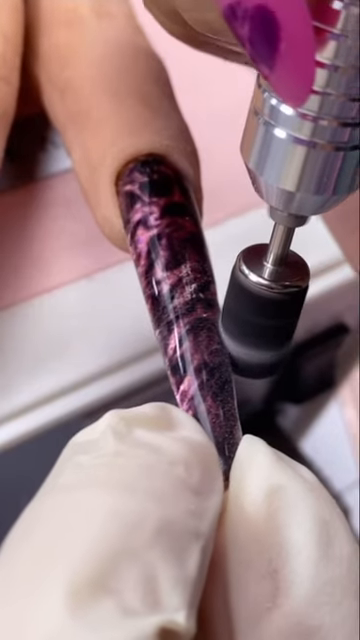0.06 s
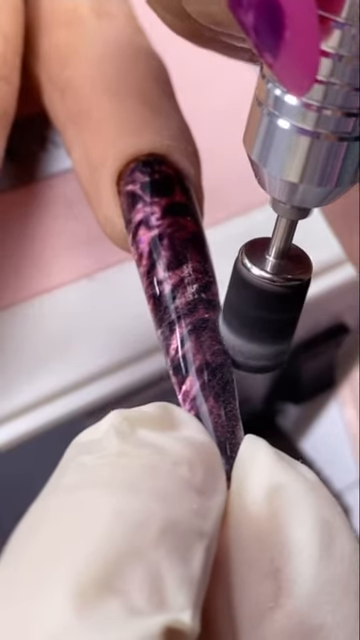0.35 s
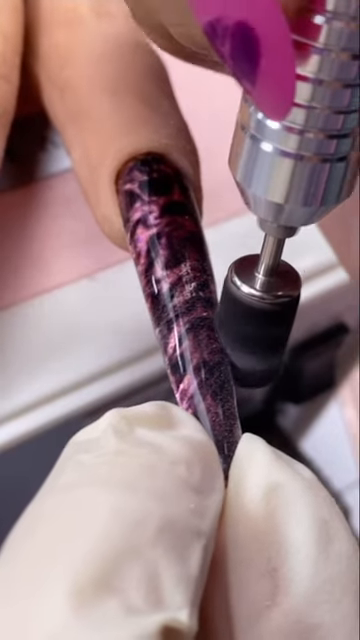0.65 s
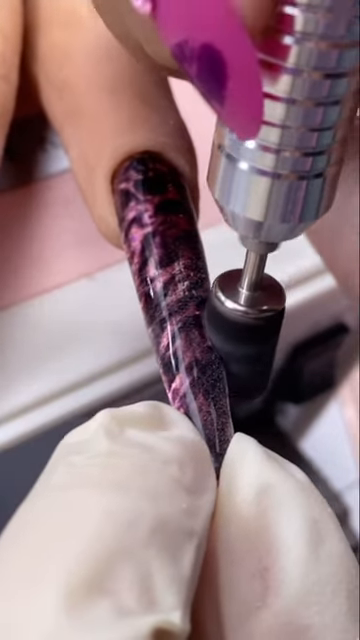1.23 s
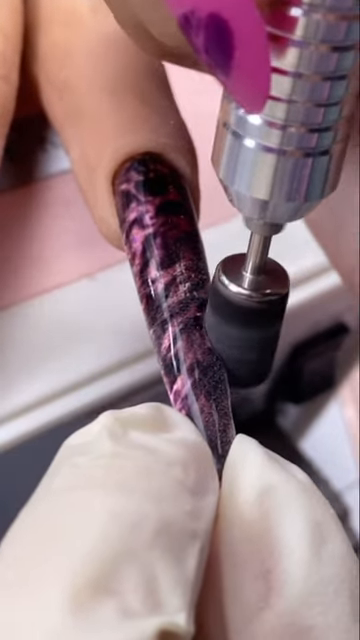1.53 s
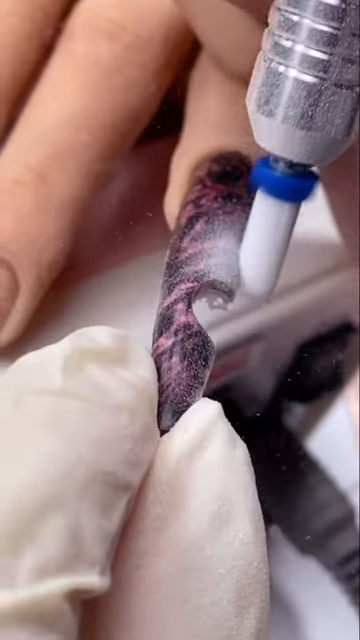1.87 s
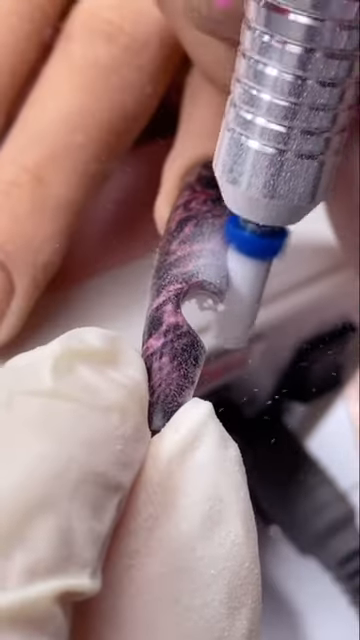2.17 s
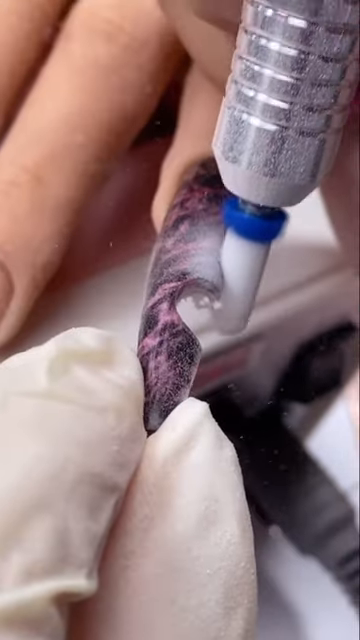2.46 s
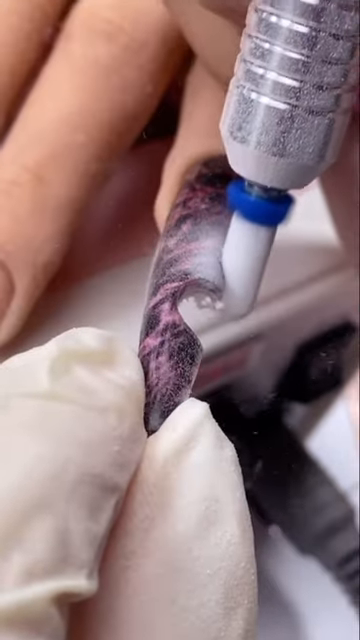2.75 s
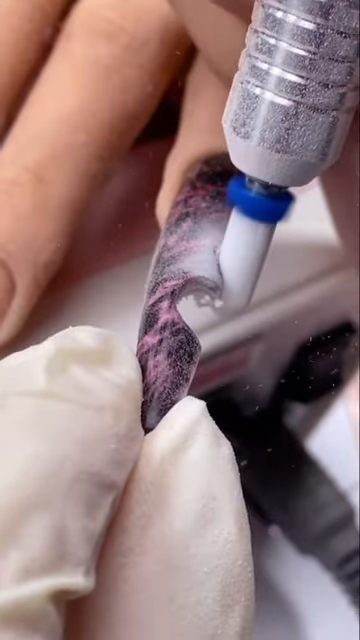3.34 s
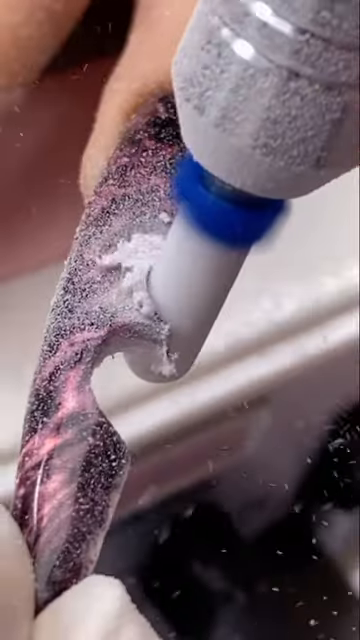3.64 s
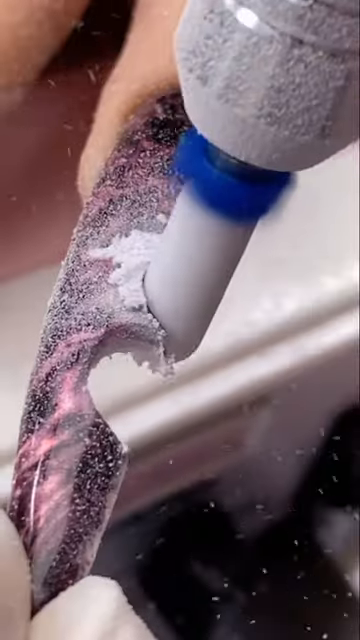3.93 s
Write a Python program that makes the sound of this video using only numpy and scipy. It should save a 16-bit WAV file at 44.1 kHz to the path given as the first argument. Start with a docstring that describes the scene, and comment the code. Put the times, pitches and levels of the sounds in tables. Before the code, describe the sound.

An electric nail drill whines close up in a quiet room, rasping on a hard nail in short strokes. It switches abruptly to higher grinding and squealing, nearly stalls, then runs fast and light.

```python
"""An electric nail drill works on a hard artificial nail, close up in a quiet room, in three abrupt stages.
A sanding band rasps in short strokes that slow the motor; a ceramic cutter grinds and squeals until it
nearly stalls; then the drill runs fast and light. The motor whines at multiples of the shaft speed.
Bit and bearings repeat part of their noise on every turn."""
import sys
import numpy as np
from scipy import signal
from scipy.fft import rfft, irfft
from scipy.io import wavfile

SR = 44100
rng = np.random.default_rng(int(sys.argv[2]) if len(sys.argv) > 2 else 0)


def inscribe(sig):
    """Save sig as 16-bit PCM at rate SR to the path in sys.argv[1].

    A 1-D sig is mono; a 2-D sig holds one channel per row.
    Samples are clipped to [-1, 1] before scaling.
    """
    pcm = np.round(np.clip(np.atleast_2d(sig).T, -1, 1) * 32767)
    wavfile.write(sys.argv[1], SR, pcm.astype(np.int16))


N = 176400
T = np.arange(N) / SR
SANDING_END_S, STALL_S, LIGHT_START_S = 1.583, 3.585, 3.595
SWELL_S = 0.021


def from_db(db):
    """Decibels to gain."""
    return 10 ** (np.asarray(db) / 20)


def rms_one(x):
    """Scale to unit power."""
    return x / np.sqrt(np.mean(x ** 2) + 1e-20)


def in_time(rows):
    """Each value column of a time table, at every sample."""
    time_s, *columns = np.transpose(rows)
    return [np.interp(T, time_s, column) for column in columns]


def between(start_s, end_s):
    """Gate with 3 ms edges."""
    return np.clip((T - start_s) / .003 + .5, 0, 1) * np.clip((end_s - T) / .003 + .5, 0, 1)


def drift(rate_hz):
    """Smooth random wander of unit power."""
    pole = np.exp(-2 * np.pi * rate_hz / (SR / 20))
    slow = signal.lfilter([1], [1, -2 * pole, pole * pole], rng.standard_normal(N // 20 + 2002))[2000:]
    return np.interp(np.arange(N) / 20, np.arange(len(slow)), rms_one(slow))


def colour(x, spectrum):
    """Filter by a spectrum, rolling off below its first point; unit power."""
    hz, db = np.transpose(spectrum)
    bin_hz = np.maximum(np.arange(N // 2 + 1) * SR / N, 1)
    skirt = 1 / np.sqrt(1 + (hz[0] / bin_hz / 2) ** 4)
    gain = from_db(np.interp(np.log(bin_hz), np.log(hz), db))
    return rms_one(irfft(rfft(x) * skirt * gain, N))


def turning(hz, flutter, flutter_hz):
    """Cycles completed at a slightly unsteady rate."""
    return np.cumsum(hz * (1 + flutter * drift(flutter_hz))) / SR


def whine(turns, levels_db, waver_db, waver_hz, first=1):
    """Successive shaft harmonics, each wavering in level; unit power."""
    out = 0
    for k, db in enumerate(levels_db, first):
        gain = from_db(db + waver_db * drift(waver_hz))
        out += gain * np.sin(2 * np.pi * (k * turns + rng.random()))
    return rms_one(out)


def body_tones(turns, speed_hz, body, waver_db, waver_hz, top):
    """Shaft harmonics 2 to top swell and fade as they glide through fixed resonances; unit power."""
    hz, db = np.transpose(body)
    levels_db = [np.interp(k * speed_hz, hz, db) for k in range(2, top + 1)]
    return whine(turns, levels_db, waver_db, waver_hz, first=2)


def grit(turns, spectrum, repeat, beat_db, grain_db, grains=512):
    """Grains round the bit strike each turn, partly renewed; one side presses harder. Unit power."""
    shape = (int(turns[-1]) + 202, grains)
    fresh = rng.standard_normal(shape) * from_db(grain_db * rng.standard_normal(shape))
    surface = signal.lfilter([1], [1, -repeat], fresh, axis=0)[200:].ravel()  # 200 turns to settle
    position = np.interp(np.arange(N * 4) / 4, np.arange(N), turns) * grains  # 4x oversampled
    rubbing = signal.resample_poly(np.interp(position, np.arange(len(surface)), surface), 1, 4)
    return colour(rubbing * from_db(beat_db * np.cos(2 * np.pi * turns)), spectrum)


def sanding_band():
    """The motor whines; the unbalanced band hums and fizzes, and buzzes, rasps and hisses in strokes."""
    # shaft speed (time [s], speed [Hz])
    shaft = [(0.0, 207.1), (0.06, 205.7), (0.122, 201.7), (0.188, 207.9), (0.238, 214.8), (0.3, 218.6),
             (0.356, 216.1), (0.484, 206.2), (0.7, 196.0), (0.776, 196.3), (0.838, 202.9), (0.978, 190.1),
             (1.004, 184.8), (1.028, 184.5), (1.12, 189.2), (1.27, 178.5), (1.35, 181.7), (1.41, 175.4),
             (1.46, 174.5), (1.534, 181.0), (1.585, 181.3)]
    # band strokes (time [s], relative hiss [dB], relative rasp [dB])
    strokes = [(0.0, -34, -42), (0.074, -38, -38), (0.122, -31, -35.5), (0.156, -36, -41),
               (0.17, -32.5, -36), (0.2, -38, -38), (0.236, -38.5, -41), (0.274, -33, -43),
               (0.328, -36, -41), (0.528, -36.5, -40), (0.63, -30, -33), (0.704, -35, -36),
               (0.73, -32, -36), (0.832, -37, -37.5), (0.884, -30, -34), (0.954, -35.5, -36.5),
               (1.006, -32, -34.5), (1.084, -35.5, -41), (1.124, -31, -33.5), (1.216, -38, -39),
               (1.256, -31.5, -35), (1.322, -36, -36.5), (1.354, -32, -35), (1.41, -37.5, -37),
               (1.468, -32, -37.5), (1.522, -35, -38), (1.56, -33, -33), (1.58, -37, -35.5)]
    # unbalance hum, motor whine (time [s], relative level [dB])
    hum_level = [(0.0, -40), (0.264, -43), (0.432, -37.5), (0.714, -46.5), (0.864, -40.5), (0.974, -52.5),
                 (1.522, -49.5), (1.585, -53)]
    motor_level = [(0,-31.5),(.06,-33.5),(.11,-38),(.2,-35),(.27,-35),(.34,-33.5),(.47,-40),(.56,-31.5),(.8,-45.5),(1.0,-38.5),(1.585,-39.5)]
    # resonances (frequency [Hz], gain [dB])
    motor_body = [(400,-21.5),(630,7.5),(850,-13),(1050,9),(1300,-3),(1550,3),(1900,-0.5),(2420,5.5),(2750,-20),(3450,1),(3750,-3),(4200,-6),(5100,-3),(6200,-6),(6900,1),(7800,-20),(8500,-16),(9300,-1)]
    buzz_body = [(400,-10.5),(600,1.5),(800,-1),(1000,5),(1200,-5.5),(1420,0),(1620,6.5),(1800,7.5),(2050,-10),(2400,1.5),(2650,0.5),(3100,-11),(3700,-16),(5000,-8)]
    # band noise spectra (frequency [Hz], gain [dB])
    rasp_spectrum = [(300,-17.5),(600,-11),(950,-8.5),(1250,-1),(1650,-2.5),(2000,-15),(2450,6),(2900,-10),(3700,-3),(5000,-11),(9000,-31)]
    hiss_spectrum = [(900,-53.5),(2000,-1.5),(3000,-2.5),(4500,0.5),(5300,-3),(6300,1),(6900,-1.5),(7700,4),(8500,4),(9300,-3.5),(12000,-6.5),(14000,-14),(16000,-21)]
    fizz_spectrum = [(6000,-20),(10400,1.5),(12900,3),(13800,3),(15800,-6)]
    speed_hz, = in_time(shaft)
    hiss_db, rasp_db = in_time(strokes)
    hum_db, = in_time(hum_level)
    motor_db, = in_time(motor_level)
    turns = turning(speed_hz, flutter=0.0014, flutter_hz=29.2)
    hum = from_db(hum_db + 3) * np.sin(2 * np.pi * turns)
    motor = body_tones(turns, speed_hz, motor_body, waver_db=3, waver_hz=6.7, top=45)
    motor *= from_db(motor_db - 1)
    buzz = body_tones(turns, speed_hz, buzz_body, waver_db=1.5, waver_hz=12.3, top=26)
    buzz *= from_db(rasp_db + 0.7)
    rasp = from_db(rasp_db + 0.5) * grit(turns, rasp_spectrum, repeat=0.81, beat_db=4, grain_db=6)
    hiss = from_db(hiss_db + 2.5) * grit(turns, hiss_spectrum, repeat=0.52, beat_db=2, grain_db=2.5)
    fizz = from_db(-41.5) * grit(turns, fizz_spectrum, repeat=0.7, beat_db=1.5, grain_db=3)
    ringing = nail_ringing(turns, speed_hz)
    return (hum + motor + buzz + rasp + hiss + fizz + ringing) * between(-1, SANDING_END_S)


def nail_ringing(turns, speed_hz):
    """Nail and handpiece resonate briefly, lifting the nearby shaft harmonics."""
    # resonances (start [s], end [s], centre [Hz], width [Hz], level [dB])
    rings = [(-.03,.11,4680,170,-36.5), (-.03,.09,6400,100,-42), (.03,.11,2400,120,-40),
             (.22,.31,3520,200,-40), (.3,.38,2380,100,-35), (.31,.41,3880,80,-41), (.31,.53,4330,240,-37.5),
             (.41,.5,4600,120,-40), (.39,.54,8050,300,-42), (.4,.7,3500,110,-43), (.57,.65,4000,550,-37),
             (.56,.64,2420,120,-37), (.62,.74,1650,200,-39), (.85,.92,3700,150,-40), (.86,.92,1600,150,-38),
             (1.1,1.17,2450,130,-37.5), (1.23,1.3,2450,120,-33.5), (1.23,1.28,4700,300,-39),
             (1.32,1.39,2440,120,-34), (1.43,1.5,2440,120,-36), (1.535,1.59,2450,120,-37)]
    out = np.zeros(N)
    for start_s, end_s, centre_hz, width_hz, db in rings:
        on = (T > start_s) & (T < end_s)
        swell = np.clip(np.minimum(T[on] - start_s, end_s - T[on]) / SWELL_S, 0, 1)
        harmonics = np.round(centre_hz / speed_hz[on].mean()) + np.arange(-5, 6)[:, None]
        weights = np.exp(-((harmonics * speed_hz[on] - centre_hz) / width_hz) ** 2 / 2) + 1e-9
        cluster = weights * np.sin(2 * np.pi * (harmonics * turns[on] + rng.random(harmonics.shape)))
        out[on] += swell * from_db(db + 0.91 * drift(50)[on]) * rms_one(cluster.sum(axis=0))
    return out


def room(mains_hz=121):
    """Faint rumble and mains hum."""
    # room noise (frequency [Hz], gain [dB])
    spectrum = [(25,-17),(55,0.5),(80,-9),(300,-10),(700,-16),(8000,-18)]
    rumble = from_db(-49.5) * colour(rng.standard_normal(N), spectrum)
    hum = from_db(-57.5 + 2.2 * drift(11)) * np.sin(2 * np.pi * mains_hz * T)
    return rumble + hum


def ceramic_cutter():
    """The drill whines and drones; under pressure the cutter grinds, sizzles and chatters."""
    # shaft speed (time [s], speed [Hz])
    shaft = [(1.6,274),(1.77,276.5),(1.85,284.7),(1.92,287.5),(2.03,286),(2.16,276.3),(2.28,272.5),(2.38,265.3),(2.46,262),(2.6,266.4),(2.72,269.3),(2.88,275.8),(3.05,268.9),(3.25,271.6),(3.5,280.1),(3.58,222)]
    # pressure as grinding level, motor whine, motor drone, sizzle (time [s], relative level [dB])
    pressure = [(1.6, -40.5), (1.71, -41), (1.72, -50), (1.798, -48), (2.052, -47.5), (2.1, -40),
                (2.206, -38), (2.222, -48), (2.234, -42), (2.344, -30.5), (2.548, -34.5), (2.608, -40.5),
                (2.692, -36), (2.906, -38.5), (3.0, -34), (3.22, -39), (3.282, -36), (3.552, -52.5),
                (3.562, -34), (3.58, -38)]
    motor_level = [(1.6,-38),(1.78,-33),(1.85,-33),(2.03,-33),(2.12,-36.5),(2.6,-35.5),(3.3,-35),(3.48,-31),(3.58,-42)]
    drone_level = [(1.6,-45),(1.9,-49.5),(2.27,-44),(2.34,-38),(2.62,-45),(3.0,-43.5),(3.5,-47.5),(3.58,-70)]
    sizzle_level = [(1.6, -45.5), (1.864, -62), (2.294, -42), (2.344, -31), (2.558, -45), (2.652, -50),
                    (2.68, -37), (2.918, -62), (2.988, -35), (3.104, -55), (3.27, -43.5), (3.54, -56),
                    (3.58, -40)]
    # motor harmonics from the first up (relative level [dB])
    harmonics_db = [-21, -21.5, -17.5, -15.5, -14, -22, -9.5, -9, -8, -7.5, -27, -17, -21, -27, -12, -1.5,
                    -9, -12, -32, -16, -19, -24, -17, -7.5, -42, -32, -28, -11, -1.5, -9, -8.5, -11, -21,
                    -28, -26, -28, -29, -25, -25, -12]
    # noise spectra (frequency [Hz], gain [dB])
    bearing_spectrum = [(180, -57), (300, -24), (880, -22.5), (1050, -15), (1770, -14), (2430, -12),
                        (2820, -5.5), (3740, -26), (4490, -20), (7510, -16.5), (8570, -12.5),
                        (15800, -31.5)]
    grind_spectrum = [(300,-52),(800,-28),(1050,-23),(1450,-21),(1800,-25),(2100,-6),(2400,-0.5),(2700,-0.5),(3020,1),(3350,-14.5),(3650,4),(4000,6),(4600,5.5),(5200,-0.5),(5800,1),(6400,4),(7100,-4),(8000,4.5),(8600,3),(9400,-7.5),(12000,-15.5),(16000,-23)]
    sizzle_spectrum = [(5000,-29),(8000,5),(9400,-0.5),(10450,4.5),(11600,-8.5),(12700,1.5),(13600,-14),(16000,-23)]
    rumble_spectrum = [(25,-24),(60,3),(130,-21),(400,-27)]
    # shaft harmonics ringing out (start [s], end [s], harmonic, relative level [dB])
    motor_whistles = [(1.58,1.79,11,-47), (1.8,2.08,10,-39.5), (1.78,2.14,16,-42.5), (2.07,3.53,11,-46)]
    # chatter per contact (time [s], pitch [Hz], relative tone [dB], relative octave [dB])
    first_bite = [(1.6, 2126, -30.5, -35.5), (1.706, 2142, -32, -41), (1.75, 2200, -59, -79)]
    long_bite = [(2.06, 2258, -56, -61), (2.092, 2162, -31.5, -37.5), (2.202, 2130, -30.5, -28),
                 (2.22, 2147, -44, -44), (2.242, 2190, -33, -28.5), (2.284, 2192, -41, -45),
                 (2.308, 2130, -25, -33), (2.402, 2025, -26.5, -25), (2.576, 2058, -27.5, -26),
                 (2.6, 2043, -34.5, -37), (2.64, 2142, -31.5, -38), (2.698, 2115, -34.5, -36),
                 (2.75, 2112, -37.5, -41), (2.83, 2129, -33.5, -29), (2.88, 2149, -28, -38),
                 (2.94, 2130, -36.5, -35), (2.96, 2120, -27.5, -34), (2.986, 2079, -29, -40),
                 (3.058, 2065, -27, -32.5), (3.13, 2120, -32, -32.5), (3.224, 2085, -32.5, -56),
                 (3.282, 2125, -33, -32.5), (3.388, 2146, -36, -38.5), (3.422, 2175, -40, -33),
                 (3.448, 2234, -69, -34.5), (3.502, 2243, -36, -39), (3.52, 2107, -55, -61),
                 (3.536, 2042, -38.5, -42), (3.58, 1768, -34, -32)]
    # chatter side tones (start [s], end [s], multiple of pitch / 8, relative level [dB])
    bite_whistles = [(2.29,2.39,18,-35),(2.29,2.39,10,-39),(2.32,2.56,40,-42),(2.39,2.6,9,-44),(2.39,2.6,17,-40),(2.39,2.58,15,-41),(2.62,2.83,24,-42),(2.68,2.8,32,-42),(2.95,3.07,24,-42),(2.96,3.35,10,-46),(3.02,3.17,15,-37.5),(3.55,3.6,24,-35),(3.54,3.6,13,-40)]
    speed_hz, = in_time(shaft)
    pressure_db, = in_time(pressure)
    motor_db, = in_time(motor_level)
    drone_db, = in_time(drone_level)
    sizzle_db, = in_time(sizzle_level)
    turns = turning(speed_hz, flutter=0.00054, flutter_hz=28.6)
    motor = from_db(motor_db - 3) * whine(turns, harmonics_db, waver_db=2, waver_hz=16)
    judder = 1 + 0.31 * from_db(pressure_db - pressure_db.max()) * drift(96)  # load roughens the drone
    drone = from_db(drone_db + 3) * judder * np.sin(2 * np.pi * 4 * turns)
    bearings = from_db(-40) * grit(turns, bearing_spectrum, repeat=0.4, beat_db=2, grain_db=5)
    grind_gain = from_db(pressure_db + 6 + 0.87 * drift(43))
    grind = grind_gain * grit(turns, grind_spectrum, repeat=0.17, beat_db=-0.5, grain_db=6)
    sizzle = from_db(sizzle_db + 5) * grit(turns, sizzle_spectrum, repeat=0.4, beat_db=2.5, grain_db=5)
    rumble = from_db(pressure_db - 21.5) * colour(rng.standard_normal(N), rumble_spectrum)
    squeals = whistles(turns, motor_whistles) + chatter(first_bite, [])
    squeals += chatter(long_bite, bite_whistles)
    gate = between(SANDING_END_S, STALL_S)
    return (motor + drone + bearings + grind + sizzle + rumble + squeals) * gate


def whistles(turns, rows):
    """Single multiples of the turning rate swell, hold and fade, slightly rough."""
    out = 0
    for start_s, end_s, k, db in rows:
        swell = np.clip(np.minimum(T - start_s, end_s - T) / SWELL_S, 0, 1)
        phase = 2 * np.pi * (k * turns + rng.random()) + 0.0082 * k * drift(53)
        out += swell * from_db(db + 4 + 0.72 * drift(52)) * np.sin(phase)
    return out


def chatter(bite, side_tones, cycles_per_turn=8):
    """The cutter's edges set the nail squealing; the tone throbs as the bit turns."""
    # upper squeal partials (harmonic, level re tone_db [dB])
    overtones = [(3,-12.5),(4,-8),(5,-28),(6,-21)]
    pitch_hz, tone_db, octave_db = in_time(bite)
    cycles = turning(pitch_hz, flutter=0.0008, flutter_hz=120)
    turns = cycles / cycles_per_turn
    partials = [(1, tone_db + 2, 0.2), (2, octave_db + 3, 0.18)]
    partials += [(k, tone_db + db, 0.4) for k, db in overtones]
    out = whistles(turns, side_tones)
    for k, db, roughness in partials:
        throb = 1 + roughness * drift(160) + 0.11 * np.cos(2 * np.pi * (turns + rng.random()))
        out += from_db(db) * throb * np.sin(2 * np.pi * k * cycles + roughness * drift(180))
    return out * between(bite[0][0] - .02, bite[-1][0] + .01)


def light_running():
    """Barely loaded, the motor whines at a high, near-steady speed; the bearings rattle and rush."""
    # shaft speed (time [s], speed [Hz])
    shaft = [(3.6,311.8),(3.75,310.8),(3.9,307.6),(4,310.3)]
    # motor harmonics from the first up (relative level [dB])
    harmonics_db = [-15.5, -27, -10, -18.5, -19, -12.5, 2, 0.5, -12, -12, -9, -26, -32, -10, -16, -15, -9,
                    -16, -9.5, -13, -17, -22, -34, -28, -26, -8, -8, -16, -24, -19, -11, -20, -19, -28]
    # bearing noise (frequency [Hz], gain [dB])
    spectrum = [(300,-5),(700,-8.5),(1100,-9),(1500,5.5),(1850,-9),(2300,6),(2900,-5.5),(4000,-6),(5500,-7),(7000,-6),(8200,0.5),(9200,-3),(10200,-7),(11500,-11.5),(16000,-24)]
    # shaft harmonics ringing out (start [s], end [s], harmonic, relative level [dB])
    motor_whistles = [(3.76,4.03,24,-44), (3.72,3.92,27,-45)]
    speed_hz, = in_time(shaft)
    turns = turning(speed_hz, flutter=0.00051, flutter_hz=32)
    motor = from_db(-33) * whine(turns, harmonics_db, waver_db=-0.5, waver_hz=8.5)
    rattle = from_db(-44.5) * grit(turns, spectrum, repeat=0.95, beat_db=-5, grain_db=6.5)
    rush = from_db(-39.5) * grit(turns, spectrum, repeat=0.057, beat_db=-3, grain_db=8)
    return (motor + rattle + rush + whistles(turns, motor_whistles)) * between(LIGHT_START_S, 10)


def scene():
    """Drill and room, the same in both ears."""
    # brief gap as the cutter begins (start [s], end [s])
    gap_s = (1.591, 1.598)
    drill = (sanding_band() + ceramic_cutter() + light_running()) * (1 - between(*gap_s))
    return np.tile(drill + room(), (2, 1))


def record(dry, cutoff_hz=15800):
    """Steep low-pass."""
    return signal.sosfilt(signal.ellip(12, .1, 90, cutoff_hz, fs=SR, output="sos"), dry)


dry = scene()
out = record(dry)
inscribe(out)
```